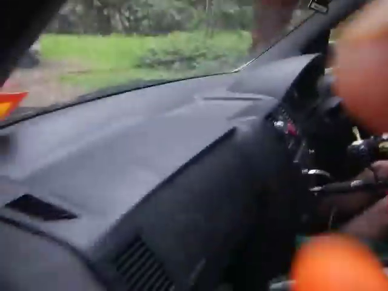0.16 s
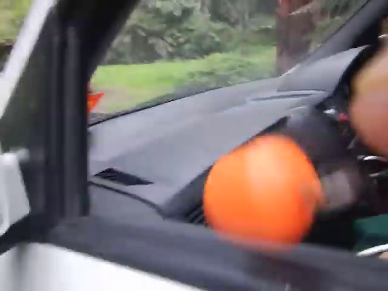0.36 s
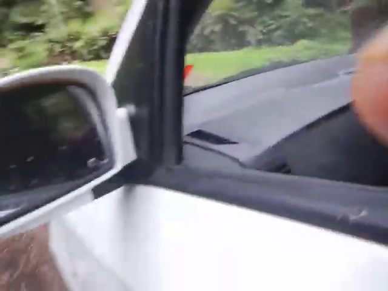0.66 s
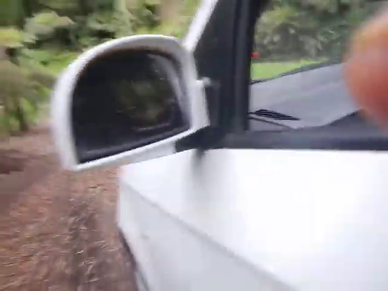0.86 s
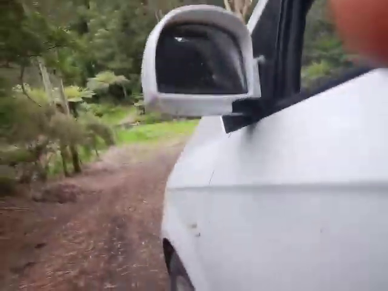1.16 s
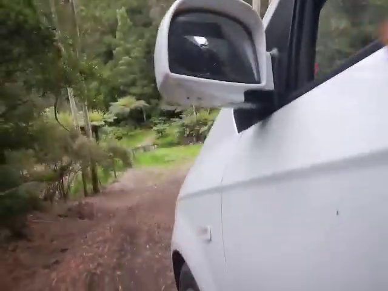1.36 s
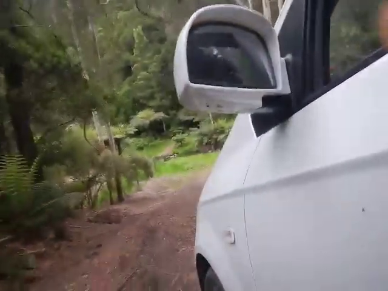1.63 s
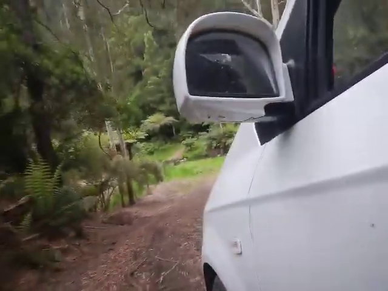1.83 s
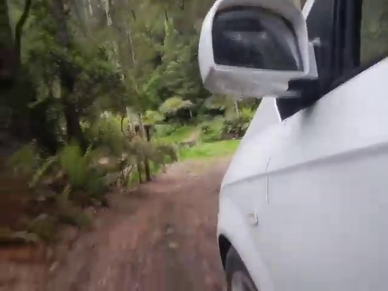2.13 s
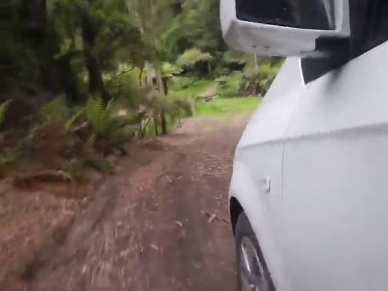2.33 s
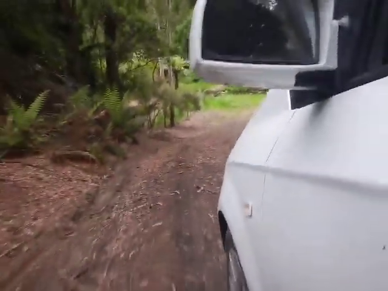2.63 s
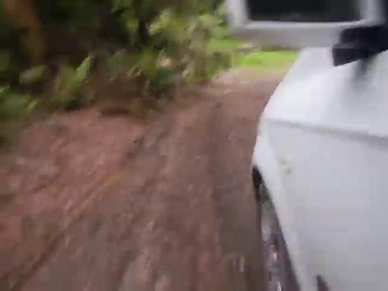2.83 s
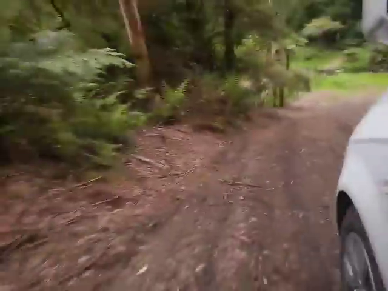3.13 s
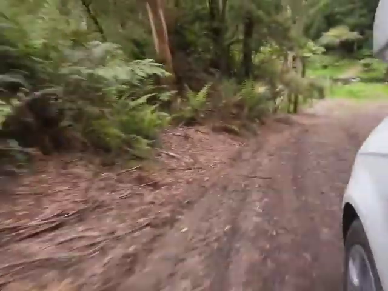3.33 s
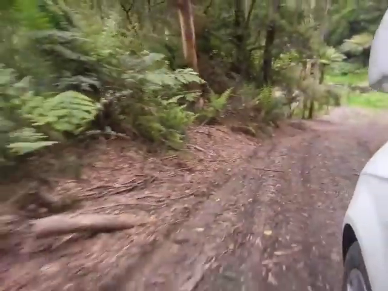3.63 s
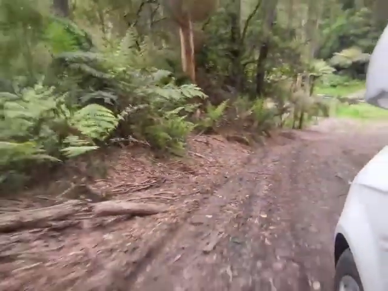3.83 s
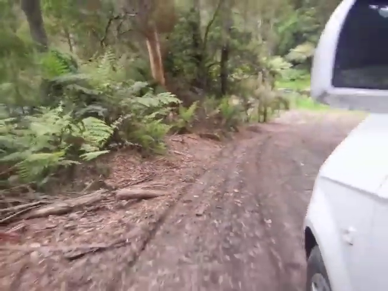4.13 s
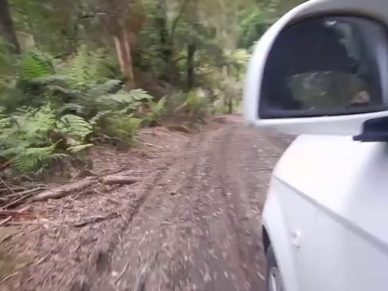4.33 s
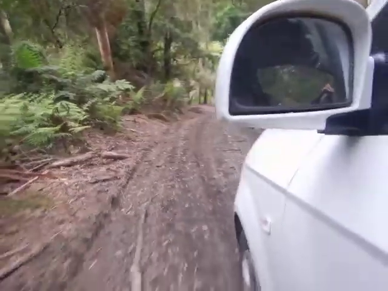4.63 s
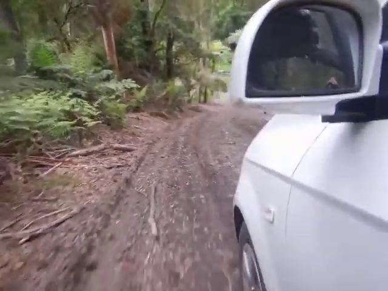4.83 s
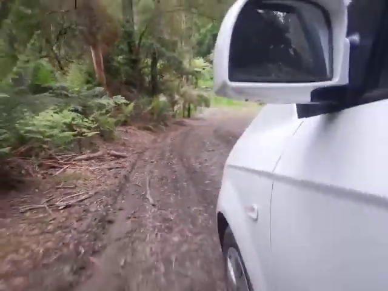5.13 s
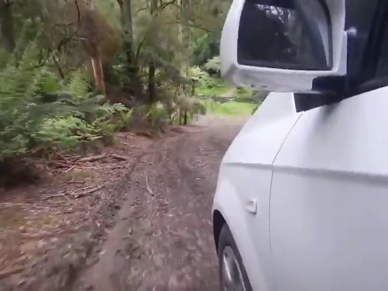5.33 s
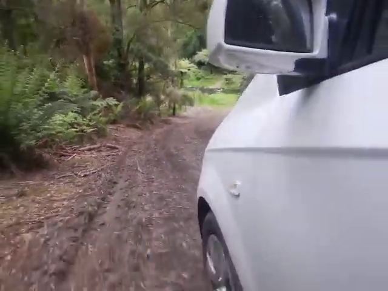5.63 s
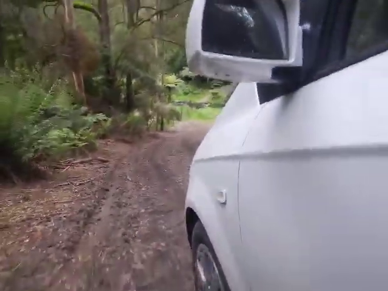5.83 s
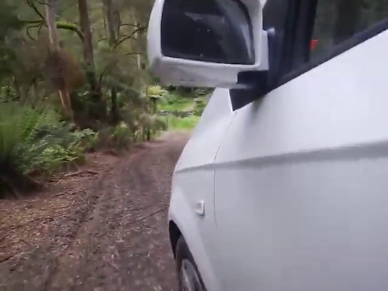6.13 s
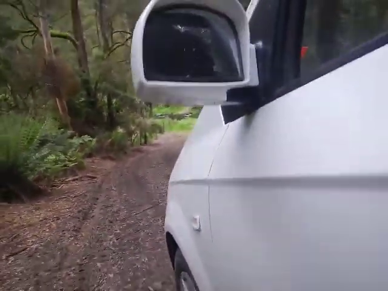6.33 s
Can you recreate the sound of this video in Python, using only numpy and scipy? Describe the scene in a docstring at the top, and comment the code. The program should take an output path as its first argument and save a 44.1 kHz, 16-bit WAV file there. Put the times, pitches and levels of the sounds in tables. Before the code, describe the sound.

A handheld phone in the wind beside a slow-moving car. Low engine hum at nearly constant revs, gravelly tyre hiss, and short hollow knocks from flying stones and twigs, thickest after four seconds. Brief leaf crackles come between them. Wind rumbles and thumps in the first half, then eases as the crunch grows. After loud hits the steady sound dips and slowly recovers.

```python
"""Forest track from a car window

A phone held out at arm's length, its two microphone ports in the wind: the engine drones at steady revs
(harmonics of the firing), tyres crunch over dirt (hiss and ringing grains) and crush dry leaves (bright noise),
twigs and stones knock the car (short rings and cracks), and wind buffets the ports (low noise, thumps, gusts).
At listed moments, most just after a loud knock or gust, the steady sounds (engine, tyres, wind, leaf fizz)
drop in level and creep back."""
import sys
import numpy as np
from scipy import signal
from scipy.fft import rfft, irfft
from scipy.io import wavfile
from scipy.ndimage import uniform_filter1d

SR = 44100
rng = np.random.default_rng(int(sys.argv[2]) if len(sys.argv) > 2 else 0)


def transcribe(u):
    """Save the signal u as a 16-bit wav file named by the first command-line argument.

    u: samples, shape (n,) or (channels, n), limited to [-1, 1]; the rate is SR.
    q: integer samples, one column per channel.
    """
    v = np.clip(np.atleast_2d(u).T, -1, 1)
    q = np.round(v * 32767).astype(np.int16)
    wavfile.write(sys.argv[1], SR, q)


N = 285327  # samples


def gain_of(db):
    """Amplitude factor of a level in dB."""
    return 10 ** (np.asarray(db) / 20)


def evened(x):
    """Scales a signal to rms 1."""
    return x / np.sqrt(np.mean(x ** 2) + 1e-20)


def read(points, hz):
    """Reads a two-column frequency table along log pitch."""
    f, value = np.transpose(points)
    return np.interp(np.log(hz + 1), np.log(f + 1), value)


def curve(rows, column):
    """Draws one column of a time table as straight lines over the scene."""
    rows = np.array(rows)
    return np.interp(np.arange(N) / SR, rows[:, 0], rows[:, column])


def add(mix, s, sound):
    """Adds a sound into the mix, in place, from s seconds on."""
    part = mix[:, round(s * SR):][:, :sound.shape[1]]
    part += sound[:, :part.shape[1]]


def wander(s):
    """Slow chance of rms 1 that changes over about s seconds."""
    width = max(round(s * SR), 2)
    smooth = uniform_filter1d(rng.standard_normal(N), width)
    return evened(uniform_filter1d(smooth, width))


# likeness of the two ports: f/Hz, likeness (0 to 1)
PORT_LIKENESS = [(60, .96), (250, 1), (1000, 0.98), (2000, 0.93), (4000, 0.57), (8000, 0.18), (14000, 0.25)]
# lean of the sound to one port: f/Hz, left over right level/dB
PORT_LEAN = [(60, 4), (700, -1), (1700, -1), (3900, -3.5), (8000, -2), (13000, -1)]
# phase between the ports: f/Hz, lead of the left port/rad
PORT_LEAD = [(60, 0.24), (200, 0.024), (1000, -0.24), (2500, 0.2), (3700, -0.24), (4100, -0.87),
             (8000, 0.76)]


def port_pair(left, other, spectrum):
    """Two ports close together hear partly the same sound, with a lean and a phase lead at each pitch."""
    hz = np.fft.rfftfreq(N, 1 / SR)
    same = np.clip(read(PORT_LIKENESS, hz), 0, 1)
    lean_db = read(PORT_LEAN, hz)
    a, b = rfft(left), rfft(other)
    left_port = a * np.exp(1j * read(PORT_LEAD, hz)) * gain_of(lean_db / 2)
    right_port = (same * a + np.sqrt(1 - same ** 2) * b) * gain_of(-lean_db / 2)
    pair = np.array([left_port, right_port])
    return evened(irfft(pair * gain_of(read(spectrum, hz)), N))


# engine speed: t/s, firing rate f/Hz
FIRING_RATE = [(0, 70.27), (.6, 70.5), (2.5, 69.97), (3.6, 69.41), (4.2, 70.3), (5, 69.26), (5.6, 69.1),
               (6.47, 68.6)]
# engine tones: multiple of the firing rate, relative level/dB
# (the quarter steps are whines of parts geared to the crankshaft)
ENGINE_TONES = [(1, -1), (2, -14), (3, -10), (4, -29.5), (5, -24.5), (6, -27), (7, -27), (8, -42),
                (8.75, -29.5), (10, -28), (11, -38), (12.75, -28), (13.25, -34), (16.5, -31.5)]


def engine():
    """One pressure pulse per firing, as its harmonics; they waver a little, and a little apart at each port."""
    turns = np.cumsum(curve(FIRING_RATE, 1)) / SR + 0.012 * wander(0.076)  # firings so far
    drone = np.zeros((2, N))
    for k, db in ENGINE_TONES:
        waver_db = 0.6 * np.sqrt(k) * wander(0.04)
        apart = 0.015 * np.sqrt(k) * wander(0.068) + read(PORT_LEAD, k * FIRING_RATE[0][1]) / 2  # radians
        apart = apart * np.array([[1], [-1]])
        lead = 0.2 * (k - 1) ** 2  # radians, staggers the harmonics
        drone += gain_of(db + waver_db) * np.cos(2 * np.pi * k * turns + lead + apart)
    return np.sqrt(2) * drone * gain_of([[-0.5], [0.5]]), turns


# the track passing by: t/s, then level/dB over the steady level of wind, tyre crunch, leaf fizz
TRACK_LEVELS = [(0, -5, -20, -45), (.25, -1.5, -15.5, -53), (.7, -13.5, -14, -11), (1.05, -11.5, -11, -16),
                (1.35, -6, -12.5, -17.5), (1.65, -9, -12, -15), (2.1, -11.5, -11.5, -22),
                (2.6, -10.5, -11, -21), (3.4, -16, -11.5, -44), (4, -6.5, -10, -46), (4.4, -23, -7, -37),
                (4.8, -13, -10.5, -40), (5.55, -15, -9.5, -35), (5.9, -8.5, -7.5, -32),
                (6.1, -16.5, -9.5, -35), (6.47, -22, -8.5, -39)]
# tyre crunch colour: f/Hz, relative level/dB per Hz
CRUNCH_COLOUR = [(150, -53), (260, -0.5), (490, -4.5), (780, -9), (910, -6), (1200, -8), (1400, -12.5),
                 (2600, -12), (4300, -14.5), (16000, -19)]


def crunch(turns):
    """A dense hiss that throbs a little with the firings, plus clumps of grit whose grains each ring briefly."""
    throb = 1 + 0.053 * np.cos(2 * np.pi * turns)
    hiss = rng.standard_normal((2, N)) * throb * gain_of(0.7 * wander(0.035))
    grains_per_s = 60 * gain_of(5.0 * wander(0.025))  # at each pitch and port
    grit = np.zeros((2, N))
    for hz in np.geomspace(500, 9000, 16):
        struck = rng.random((2, N)) < grains_per_s / SR
        size = gain_of(3.44 * np.minimum(rng.exponential(1, (2, N)), 5)) * struck
        u = np.arange(round(8 * SR / hz)) * hz / SR  # cycles
        grain = np.sin(2 * np.pi * u) * u * np.exp(-u / 0.8) * hz
        grit += signal.oaconvolve(size, grain[None], axes=1)[:, :N]
    raw = hiss + 0.43 * evened(grit)
    return port_pair(*raw, CRUNCH_COLOUR) * gain_of(curve(TRACK_LEVELS, 2))


CHANCE_COUNT = 14
CHANCE_DB, CHANCE_SPREAD_DB = -4.5, 0  # over the steady level; how much weaker the least may be
CHANCE_LOW_HZ, CHANCE_HIGH_HZ, CHANCE_CRACK_DB = 683, 1220, 3


def chance_knocks(level_db):
    """Further stones at chance moments, in the same columns as the listed ones."""
    when, size, pitch = rng.random((CHANCE_COUNT, 3)).T
    s = 1 + when * (N / SR - 1.1)
    db = level_db[(s * SR).astype(int)] + CHANCE_DB - CHANCE_SPREAD_DB * size
    hz = CHANCE_LOW_HZ + (CHANCE_HIGH_HZ - CHANCE_LOW_HZ) * pitch
    return list(zip(s, db, hz, CHANCE_CRACK_DB + 0 * s))


RATTLE_S, BOUNCE_DB = 0.018, -5
# twigs and stones striking the car at listed moments: t/s, ring level/dB, ring f/Hz, crack level/dB over the ring
LISTED_KNOCKS = [(0.18, -3, 4380, -6.5), (0.448, -17, 620, -2), (0.776, -27, 1070, 10),
                 (1.322, -16.5, 1110, -6), (1.403, -12.5, 3900, -9), (1.413, -12, 4260, -8),
                 (1.456, -21.5, 904, 8.5), (1.547, -20.5, 904, 12), (1.592, -11, 950, -13),
                 (1.913, -5.5, 1060, -7), (1.998, -17, 1444, -19), (2.05, -7, 1700, -15),
                 (2.154, -11, 1100, -10), (2.471, -8, 960, -2.5), (2.54, -27, 710, 13.5),
                 (2.618, -7, 890, -3.5), (3.087, -14, 951, -5), (3.41, -9.5, 1130, -1.5),
                 (3.655, -7.5, 1110, -18), (3.721, -22, 690, -2), (3.861, -14, 807, 0),
                 (3.906, -6, 1090, -14), (4.131, -7.5, 1104, -3.5), (4.254, -8, 1640, 2.5),
                 (4.301, -1, 1000, -16), (4.313, -6.5, 1160, -12), (4.345, -9.5, 905, 0.5),
                 (4.499, -21.5, 985, 0.5), (4.621, -20, 1100, 1.5), (4.785, -16.5, 1010, -6),
                 (4.884, -16, 1040, -9), (4.939, -18, 1040, 0), (4.955, -12, 1800, -6),
                 (5.068, -10.5, 1080, -4), (5.09, -12, 1900, -3), (5.245, -9.5, 960, -21),
                 (5.303, -18.5, 694, 5), (5.458, -13, 910, -2.5), (5.752, -5.5, 1080, -32),
                 (5.798, -12, 940, -15), (5.912, -6.5, 1110, -4), (6.192, -13.5, 1700, -2),
                 (6.232, -20.5, 1900, 7.5), (6.288, -2.5, 1140, -39), (6.299, -11, 790, 0)]


def knocks(level_db):
    """Each blow rings the panel in two modes with a wide crack, two bounces and a rattle as the piece tumbles off."""
    out, t = np.zeros((2, N)), np.arange(3000) / SR
    band = signal.butter(1, [500, 4000], "band", fs=SR, output="sos")
    for s, db, hz, crack_db in LISTED_KNOCKS + chance_knocks(level_db):
        noise = rng.standard_normal((3, len(t)))
        side_db = rng.uniform(-2.6, 0.65) - 2.0  # left over right
        ring = np.sin(2 * np.pi * hz * t) * np.exp(-t / (0.0011 + 0.59 / hz))  # low rings last a little longer
        ring += 0.4 * np.sin(2 * np.pi * 1.85 * hz * t) * np.exp(-t / 0.0008)
        burst = np.exp(-t / 0.00062) + gain_of(-12.5) * np.exp(-(t / RATTLE_S) ** 2)  # crack, then rattle
        burst *= gain_of(crack_db) * (1 - np.exp(-t / 0.0001))
        crack = evened(signal.sosfilt(band, noise[0] + 0.5 * noise[1:])) * burst  # partly shared by the ports
        blow = ring + crack
        add(blow, 0.004, gain_of(BOUNCE_DB) * ring[None])
        add(blow, 0.012, gain_of(BOUNCE_DB - 10) * ring[None])
        # a drop in the steady level cuts the blow short
        after_db = np.take(level_db, round(s * SR) + np.arange(len(t)), mode="clip")
        blow *= gain_of(np.minimum(after_db - after_db[0], 0))
        add(out, s, gain_of(db + np.array([[side_db], [-side_db]]) / 2) * blow)
    return out


# bright short bursts: crushed leaves and bark, and the sharp click of the knock at 0.18 s:
# t/s, peak level/dB, length/s
BRIGHT_BURSTS = [(0.18, -2, 0.0025), (0.447, -20, 0.011), (0.771, -13, 0.0052), (1.453, -24, .008),
                 (1.54, -21, 0.027), (1.588, -25, 0.017), (1.916, -18, 0.021), (2.405, -20, .01),
                 (2.47, -24, 0.044), (3.02, -19, 0.019), (3.409, -18, 0.028), (3.822, -26, .02),
                 (4.007, -25, .015), (4.2, -22, 0.013), (4.26, -17, .015), (4.34, -22, .006),
                 (4.503, -24, 0.016), (5.07, -18.5, .02), (5.177, -21, .015), (5.38, -19, .015),
                 (5.907, -21, 0.012), (6.04, -21, 0.017), (6.298, -30, .005)]
# dry leaf colour: f/Hz, relative level/dB per Hz
LEAF_COLOUR = [(3000, -26), (5000, 5), (6200, 9.5), (8000, 4.5), (11000, 6.5), (16000, 1)]


def leaves(level_db):
    """Dry litter under the wheels: a thin flickering fizz and bright bursts, one of them a knock's sharp click."""
    swell = gain_of(curve(TRACK_LEVELS, 3) + level_db + 3.5 * wander(0.03))[None]
    for s, db, length_s in BRIGHT_BURSTS:
        length_s = max(length_s, 0.002)
        u = np.arange(round(4 * length_s * SR)) / SR / length_s  # time in lengths
        burst = (1 - np.exp(-u[None] / 0.035)) * np.exp(-u ** 2)
        add(swell, s, gain_of(db) * burst)
    crackle = gain_of(3.5 * wander(0.0012))
    noise = rng.standard_normal((2, N)) * crackle
    return port_pair(*noise, LEAF_COLOUR) * swell


THUMP_HZ, THUMP_S = 151, 0.0177
# wind thumps on the microphones: t/s, left peak level/dB
WIND_THUMPS = [(1.135, -4), (1.772, -15.5), (2.214, -15), (2.288, -5.5), (3.853, -16)]


def thumps():
    """A gust presses the membranes for a few cycles, mostly the left one."""
    out, t = np.zeros((2, N)), np.arange(round(THUMP_S * SR)) / SR
    push = np.sin(2 * np.pi * THUMP_HZ * t) * np.hanning(len(t))
    for s, db in WIND_THUMPS:
        add(out, s, gain_of(db) * np.array([push, 0.17 * push]))
    return out


# gusts that roar into the ports: t/s, peak level/dB (mean of the ports), length/s, left over right level/dB
GUST_SWELLS = [(0.116, -22, .04, -2), (1.136, -20.5, 0.028, 0), (1.38, -28.5, 0.083, -2),
               (1.564, -24.5, 0.054, -7), (1.761, -22, 0.047, -5), (2.26, -21, 0.056, -12.5),
               (3.026, -23, 0.035, -6), (3.205, -21.5, 0.045, -3), (3.67, -23, .03, -6),
               (4.015, -23.5, 0.069, -4), (4.264, -28, 0.022, -8), (4.82, -36, 0.026, -3)]
# gust colour: f/Hz, relative level/dB per Hz
GUST_COLOUR = [(40, -7), (90, -0.5), (150, -2.5), (300, -4), (550, -16.5), (1000, -28), (2000, -39)]


def gusts():
    """Short swells of low turbulent roar, unrelated at the two ports and mostly stronger at one."""
    t, swell = np.arange(N) / SR, np.zeros((2, N))
    for s, db, length_s, lean_db in GUST_SWELLS:
        port_db = db + lean_db / 2 * np.array([[1], [-1]])
        swell += gain_of(port_db) * np.exp(-((t - s) / length_s) ** 2)
    hz = np.fft.rfftfreq(N, 1 / SR)
    roar = irfft(rfft(rng.standard_normal((2, N))) * gain_of(read(GUST_COLOUR, hz)), N)
    return evened(roar) * swell


# steady wind colour: f/Hz, relative level/dB per Hz
WIND_COLOUR = [(12, -40), (25, -3), (40, -2), (100, 1), (180, -2.5), (300, -11.5), (500, -20.5), (900, -32)]


def wind():
    """Lumpy low turbulence, only partly the same at both ports."""
    lumps = gain_of(1.5 * wander(0.046))
    shared, left, right = rng.standard_normal((3, N)) * lumps
    # gusts catch one port at a time
    left = left * gain_of(2.9 * wander(0.077))
    right = right * gain_of(3.9 * wander(0.02))
    pair = np.array([shared + 0.62 * left, 0.78 * shared + 0.81 * right])
    hz = np.fft.rfftfreq(N, 1 / SR)
    coloured = irfft(rfft(pair) * gain_of(read(WIND_COLOUR, hz)), N)
    return evened(coloured) * gain_of(curve(TRACK_LEVELS, 1))


FULL_DB, KNEE_DB = -11.5, 1
FALL_DB_PER_S, HOLD_S, RISE_DB_PER_S = 900, 0.058, 19.5
# sudden drops of the steady sounds, most just after a loud knock or gust: t/s, level reached/dB
STEADY_DROPS = [(0, -18), (0.199, -32), (1.153, -20), (1.628, -16), (1.8, -15), (1.93, -17), (2.425, -13.5),
                (2.5, -15), (2.63, -16.5), (3.42, -12), (4.3, -15), (4.335, -16.5), (4.367, -26),
                (5.319, -15), (5.88, -13), (6.241, -14), (6.317, -22)]


def steady_level_db():
    """After each drop the level waits a moment, then climbs at a steady rate and eases into its full value."""
    s, db = np.transpose(STEADY_DROPS)[:, :, None]
    since = np.arange(0, N + 32, 32) / SR - s  # every 32 samples
    fall = -FALL_DB_PER_S * since
    rise = RISE_DB_PER_S * np.maximum(since - HOLD_S, 0)
    low_db = (db + np.maximum(fall, rise)).min(0)
    eased = -KNEE_DB * np.logaddexp(-low_db / KNEE_DB, -FULL_DB / KNEE_DB)  # soft minimum
    return np.interp(np.arange(N) / 32, np.arange(len(eased)), eased)


def scene():
    """Engine, tyres, wind and leaf fizz follow the steady level; bursts, thumps and gusts keep their own."""
    drone, turns = engine()
    level_db = steady_level_db()
    steady = (drone + crunch(turns) + wind()) * gain_of(level_db)
    return steady + knocks(level_db) + leaves(level_db) + thumps() + gusts()


EDGE_HZ = 15800  # band limit
# microphone path response: f/Hz, level/dB
MIC_RESPONSE = [(20, 1.5), (4300, -0.5), (4700, -16), (6200, -16), (8000, -22), (11800, -25),
                (13000, -34.5), (16000, -34)]
# narrow dips of the microphone path: centre f/Hz
DIP_CENTRES = [2500, 3200, 5000]
# the same dips in order: width/Hz (a fifth of the depth at its edges), depth/dB
DIP_SHAPES = [(40, 15), (230, 31), (50, 13)]


def record(dry):
    """Soft overload, a microphone path with dull treble and narrow notches, then the band limit."""
    soft = 1.283 * np.tanh(dry / 1.36)
    hz = np.fft.rfftfreq(8192, 1 / SR)
    dip_db = np.zeros(len(hz))
    for at, (width, db) in zip(DIP_CENTRES, DIP_SHAPES):
        dip_db += db / (1 + (4 * (hz - at) / width) ** 2)
    log_gain = np.log(gain_of(read(MIC_RESPONSE, hz) - dip_db))
    circle = signal.hilbert(np.concatenate([log_gain, log_gain[-2:0:-1]]))  # phase that makes the filter causal
    colour = np.fft.ifft(np.exp(circle.conj())).real[:4096]
    coloured = signal.oaconvolve(soft, colour[None], axes=1)[:, :N]
    band_limit = signal.firwin(2047, EDGE_HZ, window=("kaiser", 9), fs=SR)
    return signal.oaconvolve(coloured, band_limit[None], "same")


dry = scene()
out = record(dry)
transcribe(out)
```